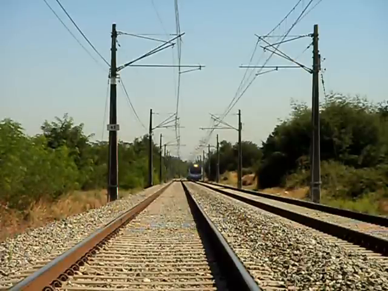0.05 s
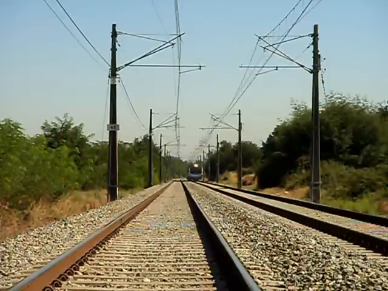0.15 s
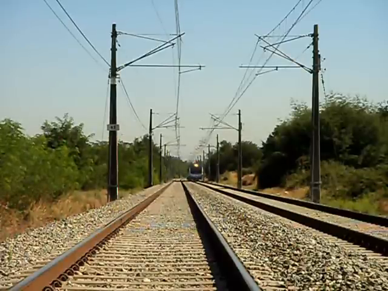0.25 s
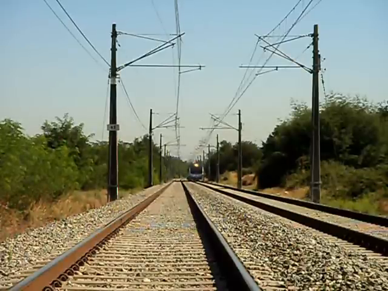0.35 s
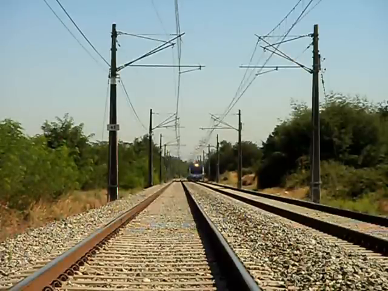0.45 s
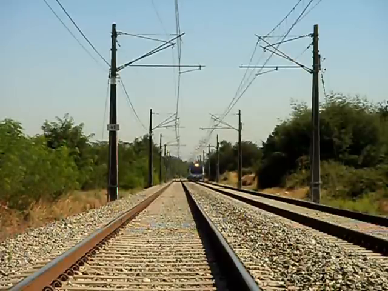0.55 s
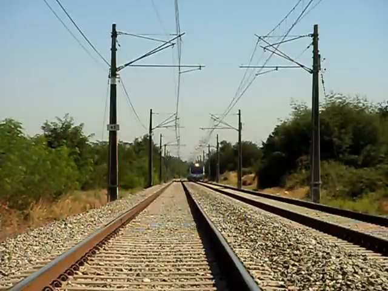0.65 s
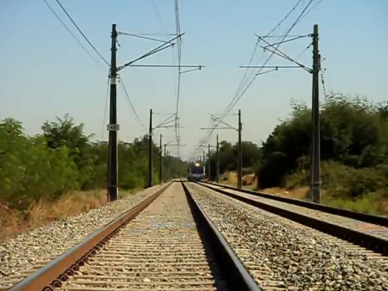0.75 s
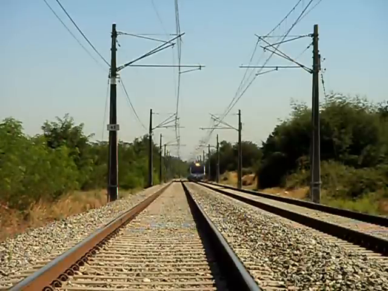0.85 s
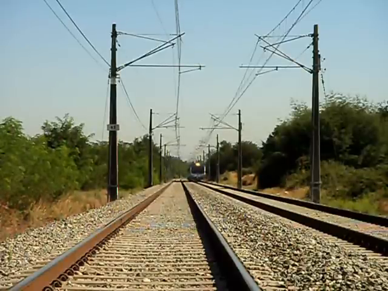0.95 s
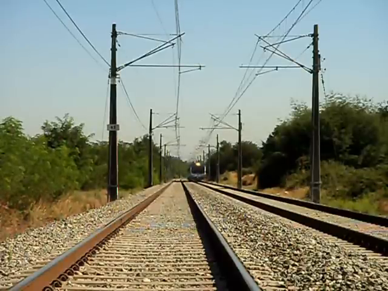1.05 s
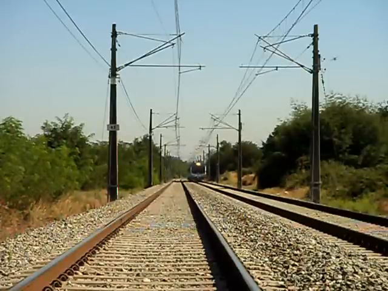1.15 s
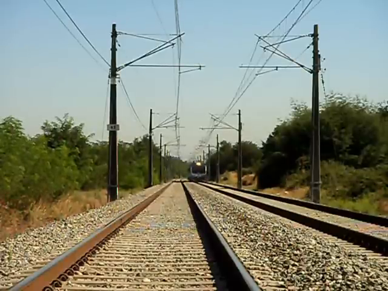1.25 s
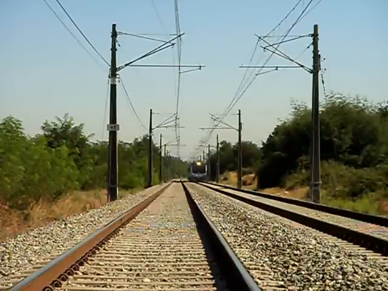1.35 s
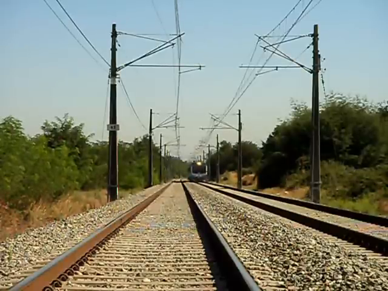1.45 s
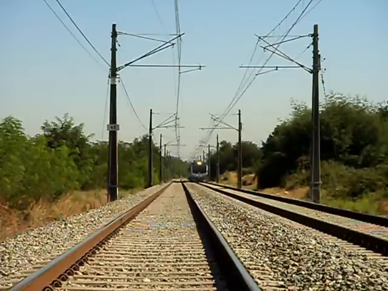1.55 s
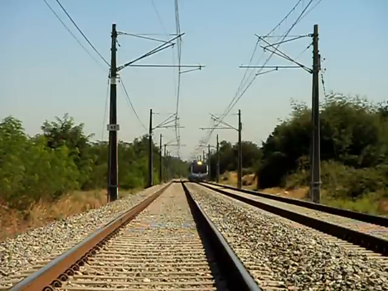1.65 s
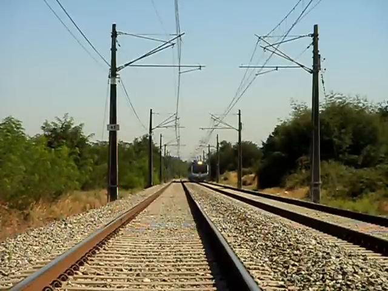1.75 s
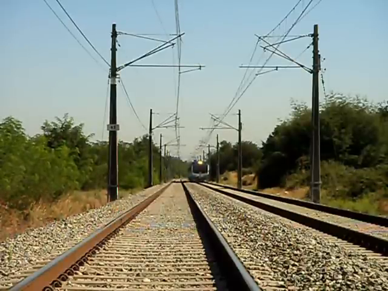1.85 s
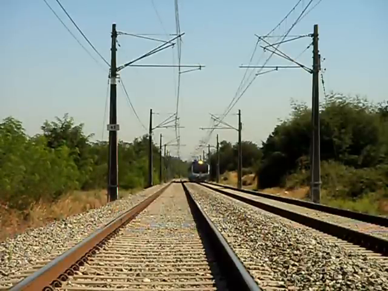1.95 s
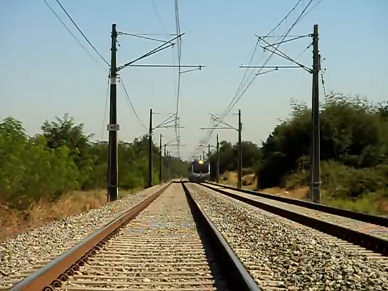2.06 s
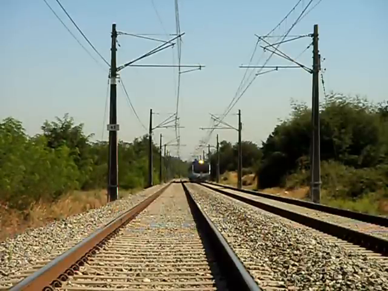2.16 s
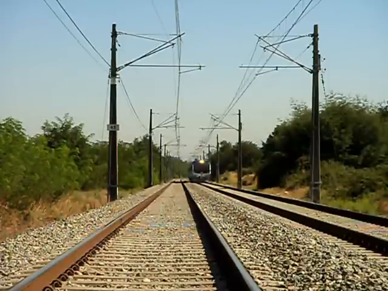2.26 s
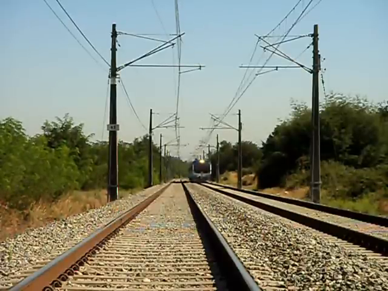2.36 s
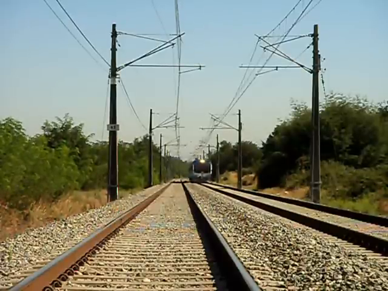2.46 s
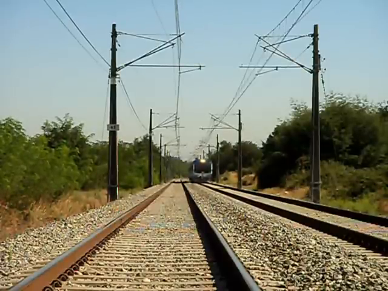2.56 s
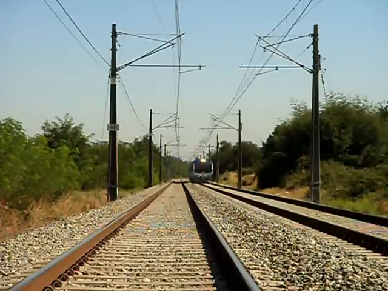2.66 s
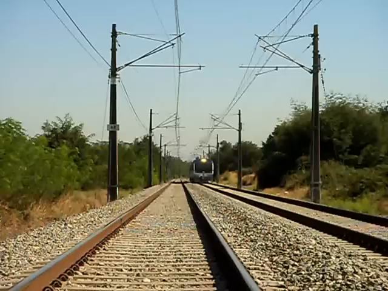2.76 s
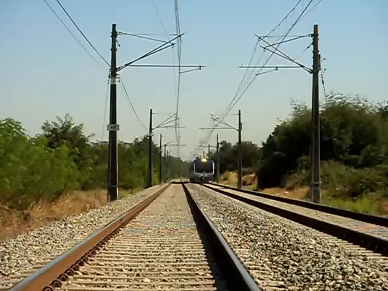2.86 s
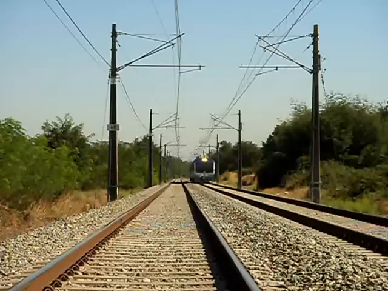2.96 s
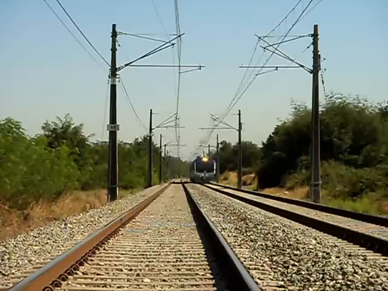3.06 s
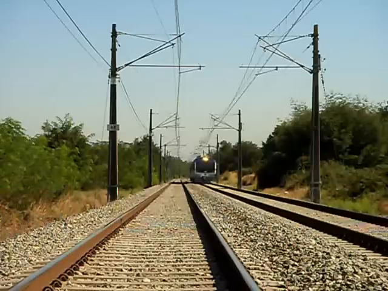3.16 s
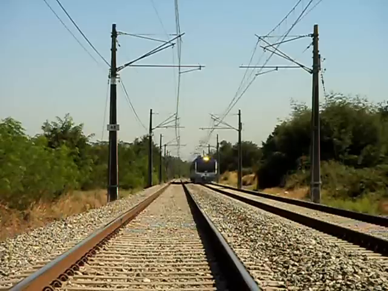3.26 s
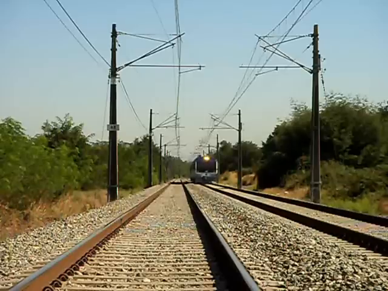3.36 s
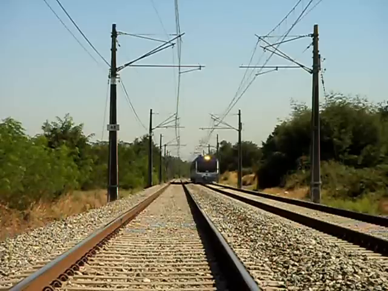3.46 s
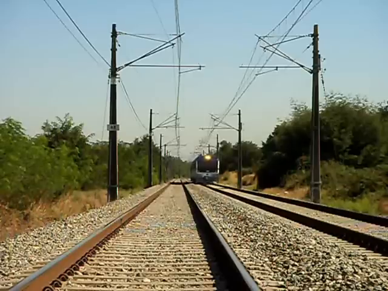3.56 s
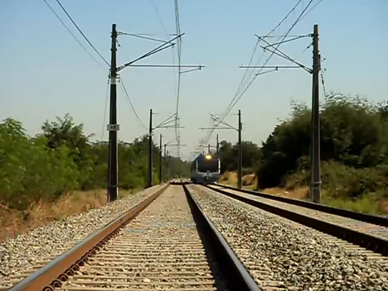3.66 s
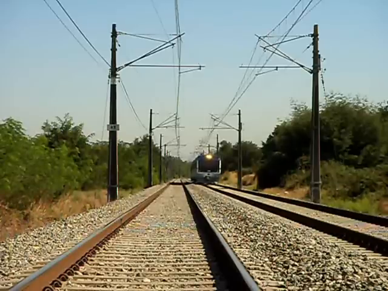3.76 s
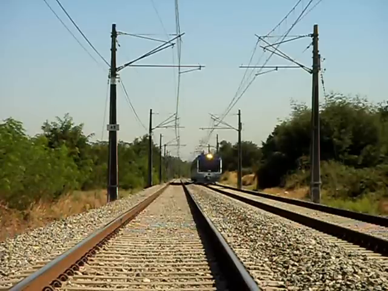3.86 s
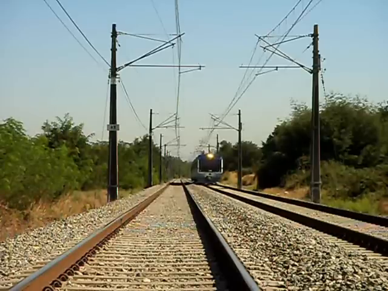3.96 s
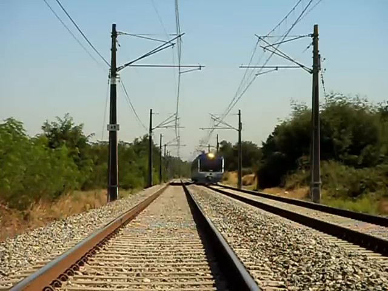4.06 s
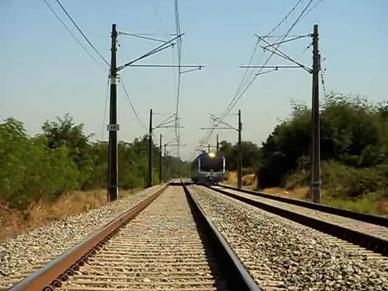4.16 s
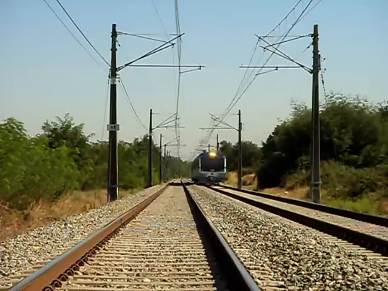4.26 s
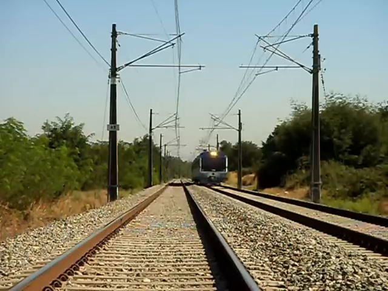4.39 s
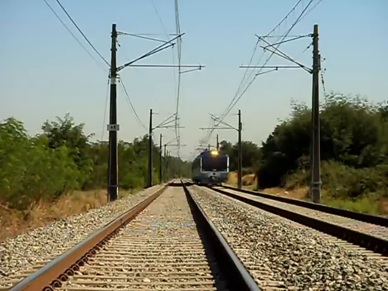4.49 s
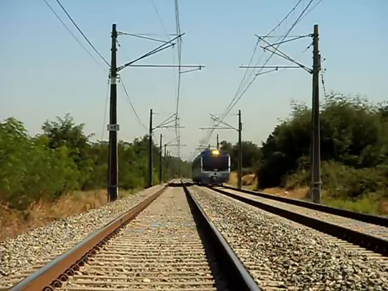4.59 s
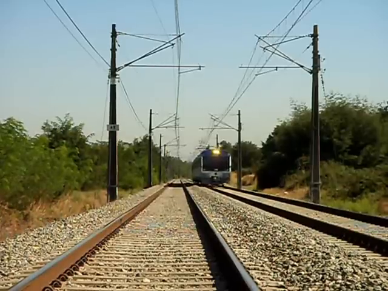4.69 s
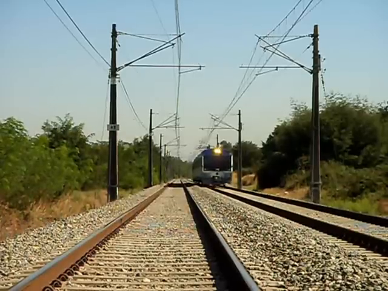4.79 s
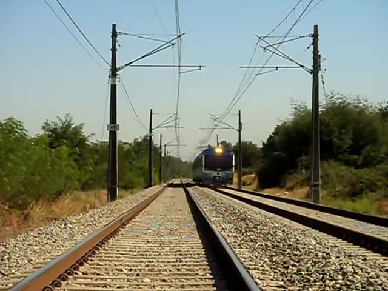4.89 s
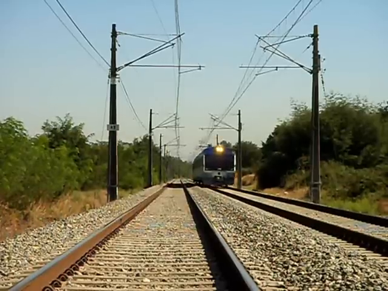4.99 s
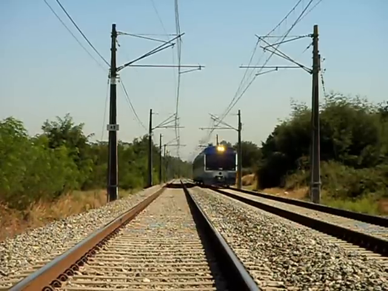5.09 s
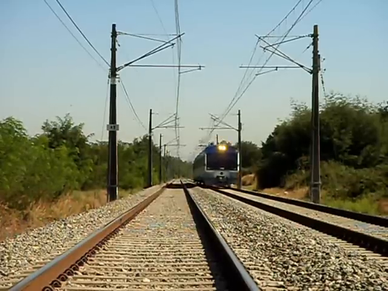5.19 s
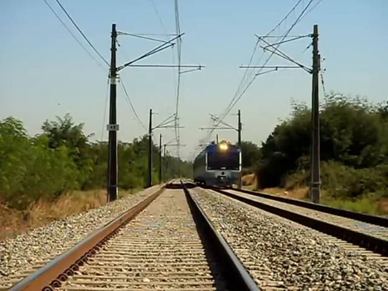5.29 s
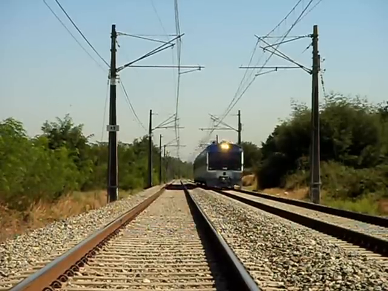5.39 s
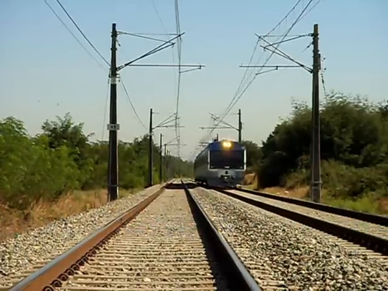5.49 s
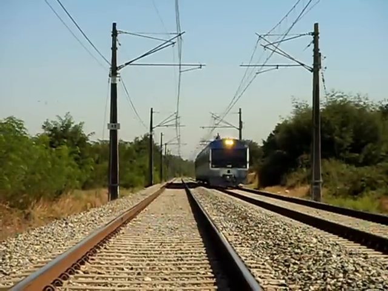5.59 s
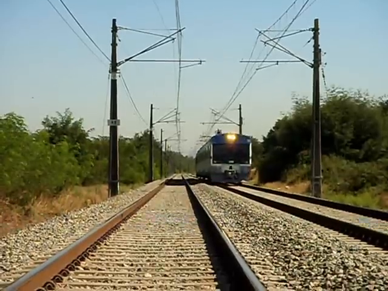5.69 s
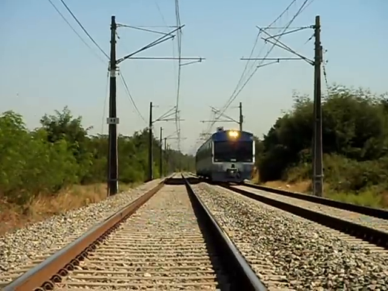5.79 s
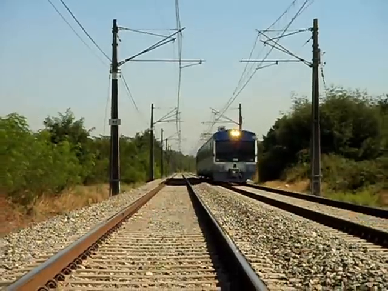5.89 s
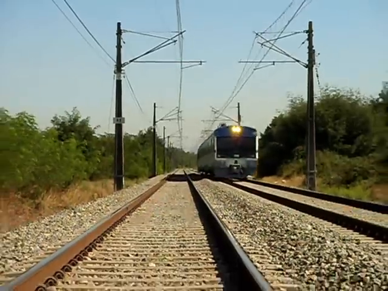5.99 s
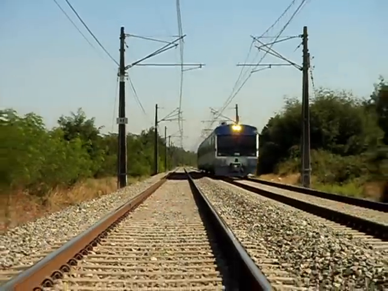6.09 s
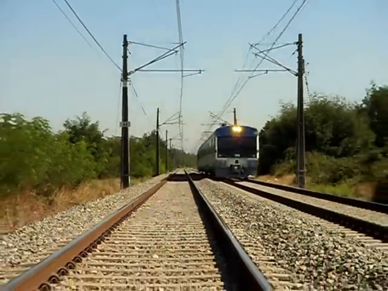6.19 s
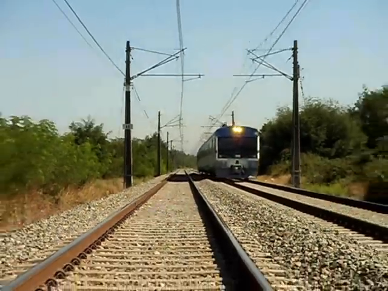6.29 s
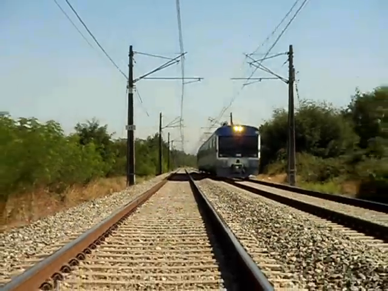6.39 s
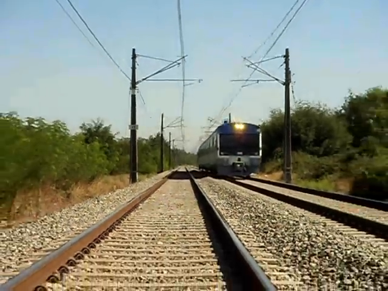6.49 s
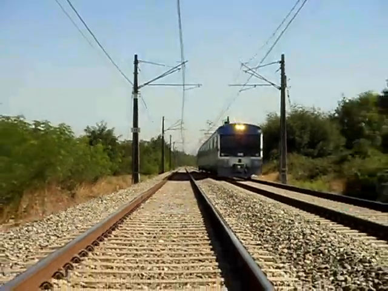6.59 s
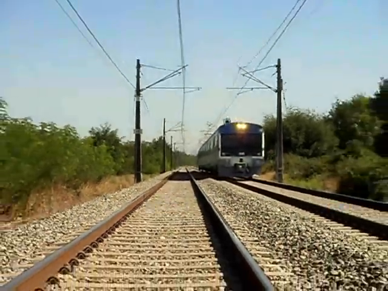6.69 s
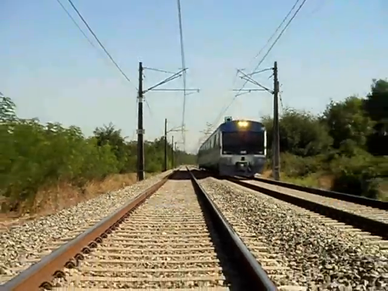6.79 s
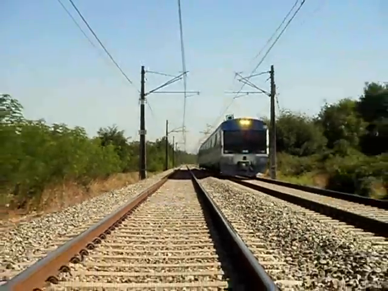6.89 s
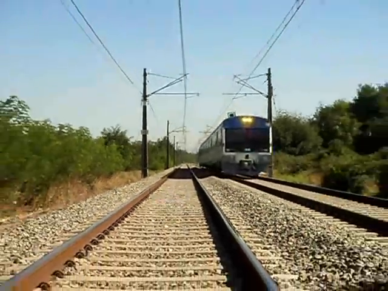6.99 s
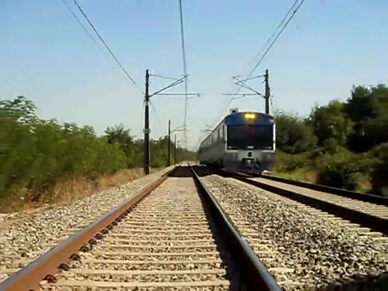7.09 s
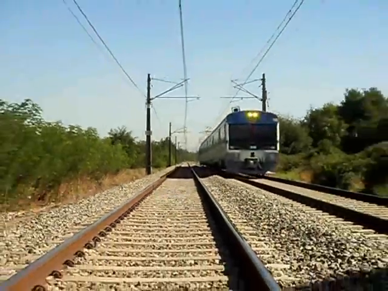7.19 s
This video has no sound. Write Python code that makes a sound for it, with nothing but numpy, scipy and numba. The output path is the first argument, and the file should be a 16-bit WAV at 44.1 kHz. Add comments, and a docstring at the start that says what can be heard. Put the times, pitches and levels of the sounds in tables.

```python
"""A rail sings in a narrow band that widens as an electric train nears; knocks ride in that band.
Rough wheels shake the rail with noise, and each frequency fades along the rail at its own rate.
Rumble, growl and roar swell through the air as filtered noise. Short broadband clicks are an edge
with a dying rattle. A bird chirps in gliding sines and noisy rasps.
A cheap four-bit recorder at half rate hisses with the level and mirrors its treble."""
import sys
import numpy as np
from scipy import signal
from scipy.fft import rfft, irfft, next_fast_len
from scipy.io import wavfile
from scipy.ndimage import uniform_filter1d, map_coordinates
from numba import njit

SR = 44100
rng = np.random.default_rng(int(sys.argv[2]) if len(sys.argv) > 2 else 0)


def put_to_file(sound):
    """Save the sound as 16-bit audio at rate SR, in the file named by the first command-line argument."""
    columns = np.atleast_2d(sound).T  # one column per channel
    safe = np.clip(columns, -1, 1)
    whole_steps = np.round(safe * 32767)
    wavfile.write(sys.argv[1], SR, whole_steps.astype(np.int16))


def decibels_to_gain(level_db):
    """Convert a level in decibels to a linear amplitude gain (20 dB per decade)."""
    exponent = np.asarray(level_db, float) / 20
    return 10 ** exponent


N = 319284

SPEED_M_PER_S, ARRIVAL_S = 25, 8.3
# Fade of the rail's low band with the train's distance.
# Columns: level in dB at 40 m, loss in dB per 100 m, loss in dB per doubling of distance.
SONG_FADE = (-31.5, 6, 5)


def along(points, hz):
    """Columns after the frequency, read on a log axis."""
    f, *cols = np.transpose(points)
    return [np.interp(np.log(hz + 1), np.log(f + 1), c) for c in cols]


def wobble(knots_per_s):
    """A smooth random curve through normally distributed knots."""
    knots = rng.standard_normal(int(N * knots_per_s / SR) + 4)
    return map_coordinates(knots, [np.arange(N) * knots_per_s / SR])


def unit(x):
    """Scaled to rms 1."""
    return x / np.sqrt(np.mean(x ** 2))


def noise(spectrum):
    """Noise with the given dB per Hz."""
    m = next_fast_len(N + 8192)
    gain = decibels_to_gain(along(spectrum, np.fft.rfftfreq(m, 1 / SR))[0]) * np.sqrt(SR / 2)
    return irfft(rfft(rng.standard_normal(m)) * gain, m)[:N]


def distance_m(s):
    """Distance to the train at time s, at constant speed."""
    return SPEED_M_PER_S * (ARRIVAL_S - s)


def faded_db(fade, s):
    """A layer's level at time s from the train's distance."""
    near_db, per_100m_db, per_doubling_db = fade
    metres = distance_m(s)
    return near_db - per_100m_db * (metres - 40) / 100 - per_doubling_db * np.log2(metres / 40)


def roughness_db(s):
    """Rougher (+) and smoother (-) stretches of rail; each swells and fades as a bell in time."""
    # Each row: middle in seconds, level change in dB, half length in seconds.
    stretches = [(.7, 3.5, .08), (1.75, 1.5, .15), (2.55, 2, .2), (3.05, -1, .12), (3.35, 1.5, .1),
                 (3.75, 1.5, .15), (4.15, -2, .15), (4.62, -2.5, .08), (5.0, -1, 0.13), (5.451, 1.16, .2),
                 (5.75, -1.5, 0.072), (6.02, -0.5, .07), (6.5, 2, .13), (6.778, -5, .15),
                 (7.098, -2.5, 0.13)]
    return sum(db * np.exp(-((s - middle_s) / half_s) ** 2) for middle_s, db, half_s in stretches)


def rail_db(hz, s):
    """Each frequency fades along the rail at its own rate; nothing is kept over a quarter of SR."""
    # What the rail radiates. Each row: frequency in Hz, level with the wheels 40 m away in dB per Hz
    # (relative where the caller rescales), loss in dB per 100 m of rail.
    radiation = [(565, -100, 54), (689, -80.5, 46.5), (798, -76, 45), (846.6, -66.5, 43.5),
                 (874, -62.5, 38), (1014, -54.5, 32), (1100, -57, 27.5), (1200, -54.5, 23),
                 (1333, -57, 14.5), (1400, -57, 11), (1450, -59, 12), (1492, -69.5, 22.5),
                 (1546, -79.5, 17), (1827, -85, 19.5), (1855, -70.5, 13), (1875, -78, 14.5),
                 (1985, -82, 17.5), (2260, -105, 19), (6565, -105, 26), (7417, -85, 30.5),
                 (8030, -82.5, 22), (8210, -81.5, 16.5), (8520, -95, 25.5), (9140, -90.5, 26.5),
                 (10030, -101, 19.5), (10600, -91.5, 16), (11170, -89, 12)]
    near_db, loss_db = along(radiation, hz)
    return np.where(hz < SR / 4, near_db - loss_db * (distance_m(s) - 40) / 100, -200)


def rolling():
    """Rough wheels on rough rail. The low band comes in lumps; the higher bands hiss more evenly."""
    lumps = unit(decibels_to_gain(.7 * wobble(16) + 1.6 * wobble(60)))
    force = rng.standard_normal((2, N)) * [lumps, decibels_to_gain(.6 * wobble(5))]
    hz, s, z = signal.stft(force, SR, nperseg=2048, noverlap=1536)
    hz = hz[:, None]
    gain = decibels_to_gain(rail_db(hz, s))
    # patches that drift in frequency and time
    patches = uniform_filter1d(rng.standard_normal(gain.shape), size=5, axis=0)
    patches = uniform_filter1d(patches, size=12, axis=1)
    gain = gain * decibels_to_gain(1.5 * unit(patches))
    low = hz < 1700
    # the low band's colour follows the distance, at unit power
    low_gain = low * gain / np.sqrt(np.mean((low * gain) ** 2, axis=0))
    high_gain = ~low * gain * np.sqrt(SR / 2)
    bands = signal.istft(z * [low_gain, high_gain], SR, nperseg=2048, noverlap=1536)[1]
    song, hiss = bands[:, :N]
    t = np.arange(N) / SR
    song_db = faded_db(SONG_FADE, t) + roughness_db(t) + .7 * wobble(6)
    return decibels_to_gain(song_db) * song + hiss


def air():
    """Rumble, growl and roar of the train, each swelling by itself, over the quiet of the field."""
    # Spectra. Each row: frequency in Hz, level in dB per Hz (relative for all but the field).
    rumble_spectrum, growl_spectrum = [(15, -18.5), (40, -7.5), (60, -1.5), (90, 0.5), (115, -6),
                                       (140, -15.5), (200, -41), (400, -120)], [(90, -30.5), (160, -12.5), (220, -12), (320, -4),
                                                       (420, 1.5), (580, -5), (750, -0.5), (1000, -9.5),
                                                       (1500, -39.5)]
    roar_spectrum, field_spectrum = [(500, -30), (1000, -4), (2200, -0.5), (3050, -2), (3300, -7),
                                     (5000, -10.5), (7000, -15.5), (11000, -19.5)], [(20, -93.5), (100, -98), (180, -101), (400, -95.5),
                                                   (1000, -95), (2000, -96.5), (3000, -101), (5000, -105),
                                                   (8000, -109), (11000, -113)]
    # Fades. Columns: level in dB at 40 m, loss in dB per 100 m, loss in dB per doubling of distance.
    rumble_fade, growl_fade, roar_fade = (-56, 3, 3.5), (-52.5, -3.5, 14), (-49, 2, 8)
    t = np.arange(N) / SR
    rumble_db = faded_db(rumble_fade, t) + 1.4 * wobble(4)
    # the growl takes on half of each stretch's dB
    growl_db = faded_db(growl_fade, t) + .5 * roughness_db(t) + 1.3 * wobble(7)
    roar_db = faded_db(roar_fade, t) + .8 * wobble(8.2)
    rumble = decibels_to_gain(rumble_db) * unit(noise(rumble_spectrum))
    growl = decibels_to_gain(growl_db) * unit(noise(growl_spectrum))
    roar = decibels_to_gain(roar_db) * unit(noise(roar_spectrum))
    return rumble + growl + roar + noise(field_spectrum)


def knocks():
    """Blows sent down the rail: lower tones arrive later, two weaker arrivals follow; small ones are random."""
    # A wheel knocks the rail. Each row: time in seconds, peak in dB, centre in Hz.
    wheel_knocks = [(0.4, -29, 1332), (0.722, -35.5, 1400), (1.294, -37, 1430), (1.43, -41, 1360),
                    (1.725, -31, 1413), (2.156, -33.5, 1433), (2.467, -31, 1286), (2.516, -33.5, 1425),
                    (2.532, -22.5, 1370), (3.23, -32.5, 1312), (3.506, -34.5, 1400), (3.615, -29, 1390),
                    (4.047, -30, 1443), (4.432, -27.5, 1370), (4.784, -27.5, 1482), (5.057, -27, 1320),
                    (5.468, -25, 1400), (5.483, -16.5, 1450), (5.695, -25.5, 1200), (5.805, -23.5, 1180),
                    (5.838, -24.5, 1300), (6.021, -22, 1100), (6.16, -22.5, 1172), (6.253, -22.5, 1120),
                    (6.322, -17.5, 1402), (6.447, -24, 1400), (6.5, -17, 1170), (6.569, -18.5, 1087),
                    (6.658, -21.5, 1128), (6.875, -13.5, 1330), (6.892, -11, 1100), (7.031, -19, 1180),
                    (7.107, -21, 1058), (7.198, -21, 1190)]
    small_count = 30
    out, size = np.zeros(N + SR), 4096
    hz = np.fft.rfftfreq(size, 1 / SR)
    lag_s = .0023 + np.clip(1300 - hz, -300, 600) * 5e-6
    delay = np.exp(-2j * np.pi * np.cumsum(lag_s) * hz[1])
    echoes = 1
    for late_s, share in [(.0036, -0.45), (.009, 0.26)]:
        echoes = echoes + share * np.exp(-2j * np.pi * hz * late_s)
    when, pitch, size_draw = rng.random((small_count, 3)).T
    small_s = .1 + when * (N / SR - .1)
    # peaks 5 to 10 dB over the faded level of the low band
    small_db = faded_db(SONG_FADE, small_s) + np.interp(size_draw, [0, 1], [5, 10])
    small = zip(small_s, small_db, np.interp(pitch, [0, 1], [1150, 1450]))
    for s, db, centre_hz in [*wheel_knocks, *small]:
        colour_db = -6 * np.minimum(((hz - centre_hz) / 310) ** 2, 3)
        blow = irfft(decibels_to_gain(rail_db(hz, s) + colour_db) * delay * echoes)
        blow = np.roll(blow, size // 2)
        out[round(s * SR) - size // 2:][:size] += decibels_to_gain(db) * blow / np.abs(blow).max()
    return out[:N]


def clicks():
    """One sharp edge with a dying rattle, each with its own width above the centre; 1.1 octaves below it."""
    # Short broadband clicks; the last, at 7.197 s, is a spike perhaps from the recorder.
    # Each row: time in seconds, peak in dB, centre in Hz, octaves above it to 6 dB down, t60 in seconds.
    broadband_clicks = [(2.808, -37.5, 798, 1, .003), (5.538, -47, 4200, 0.56, 0.0077),
                        (5.702, -12.5, 1904, 2.1, 0.0087), (5.798, -48.5, 3046, 0.68, .005),
                        (5.8217, -28.5, 2784, .9, 0.0061), (5.954, -41, 3000, 0.55, 0.0064),
                        (7.197, -23, 4700, 1.6, 0.0013)]
    out, t = np.zeros(N + SR), np.arange(1024) / SR
    hz = np.fft.rfftfreq(len(t), 1 / SR)
    for s, db, centre_hz, octaves, t60_s in broadband_clicks:
        away = np.log2(hz / centre_hz + 1e-3)
        # 6 dB down at 1.1 octaves below the centre
        body = decibels_to_gain(-6 * np.where(away > 0, away / octaves, away / 1.1) ** 2) * (hz < SR / 4)
        rattle = 0.35 * rng.standard_normal(len(t)) * decibels_to_gain(-60 * t / t60_s)
        rattle *= 1 - np.exp(-t / 0.00027)  # builds for a moment before the edge
        rattle[20] -= 1  # the edge
        snap = np.roll(irfft(rfft(rattle) * body), 64)  # room for the filter's early ringing
        out[round(s * SR) - 64:][:len(t)] += decibels_to_gain(db) * snap / np.abs(snap).max()
    return out[:N]


def bird():
    """Gliding sine notes, and short rasps of noise near 6 kHz."""
    # Each row: start in seconds, length in seconds, first Hz, last Hz, amplitude in dB before its flutter.
    chirps = [(4.24, .055, 4050, 3950, -66), (4.846, 0.056, 2920, 2510, -61),
              (5.365, 0.075, 2470, 2720, -53.5), (5.454, 0.046, 2760, 3300, -53.5),
              (5.6, .035, 2604, 2682, -58.5)]
    # Each row: middle in seconds, rms at the middle in dB.
    rasps = [(5.418, -55.5), (5.437, -53.5)]
    note_edge_s, rasp_half_s = .012, .011
    t, notes = np.arange(N) / SR, np.zeros(N)
    for s, length_s, from_hz, to_hz, db in chirps:
        hz = np.interp(t, [s, s + length_s], [from_hz, to_hz])
        shape = np.clip(np.minimum(t - s, s + length_s - t) / note_edge_s, 0, 1)
        notes += shape * decibels_to_gain(db + 1.5 * wobble(80)) * np.sin(2 * np.pi * np.cumsum(hz) / SR)
    # Hz, relative dB per Hz
    band = [(3800, -25.5), (5000, -2), (6100, 3.5), (7200, -18.5), (11000, -120)]
    rasp_level = sum(decibels_to_gain(db) * np.exp(-((t - s) / rasp_half_s) ** 2) for s, db in rasps)
    return notes + rasp_level * unit(noise(band))


def scene():
    """Everything at the one microphone."""
    return (rolling() + air() + knocks() + clicks() + bird())[None]


@njit
def four_bit(x, least, growth):
    """Sign and three bits for each change; the step grows after large codes and shrinks after small ones."""
    out, guess, step = np.empty_like(x), 0.0, least
    for i in range(len(x)):
        code = min(int(4 * abs(x[i] - guess) / step), 7)
        guess += np.sign(x[i] - guess) * (code + .5) * step / 4
        step = max(least, step * growth ** (2 * code - 6 if code > 3 else -1))
        out[i] = guess
    return out


def roll_off(x):
    """The treble ends steeply here."""
    return signal.sosfilt(signal.butter(12, 16500, fs=SR, output="sos"), x)


def record(dry):
    """Half the sample rate, four bits; holding each sample twice mirrors the treble about a quarter of SR."""
    quantised = four_bit(dry[0, ::2].copy(), 7 / 32768, 1.1)
    held = rfft(np.repeat(quantised, 2)[:N])
    kept = irfft(held * (np.fft.rfftfreq(N, 1 / SR) < 15740), N)
    return roll_off(kept[None])


dry = scene()
out = record(dry)
put_to_file(out)
```